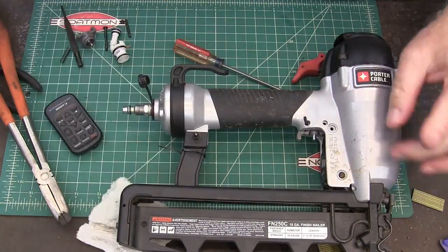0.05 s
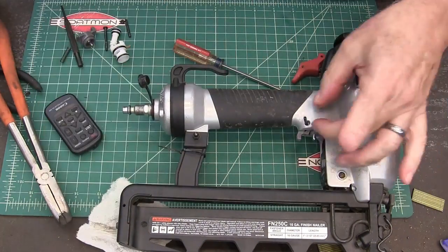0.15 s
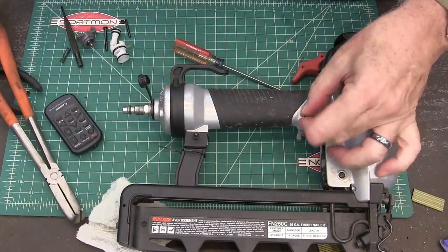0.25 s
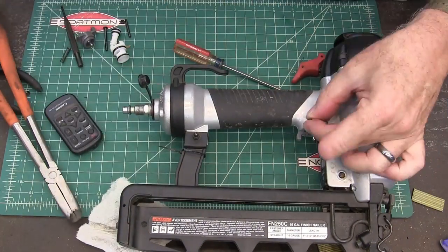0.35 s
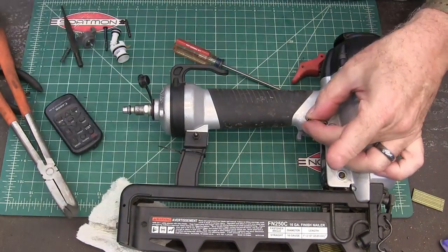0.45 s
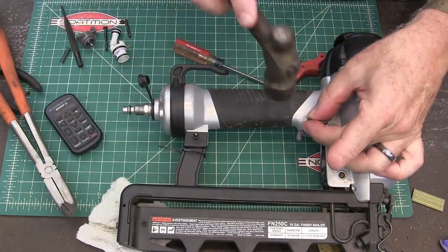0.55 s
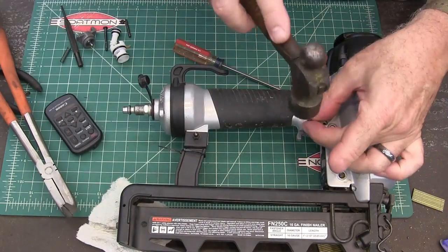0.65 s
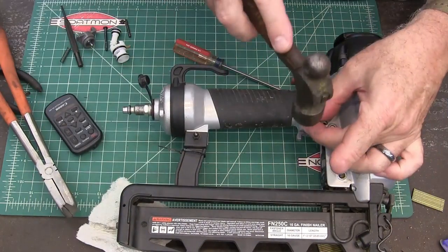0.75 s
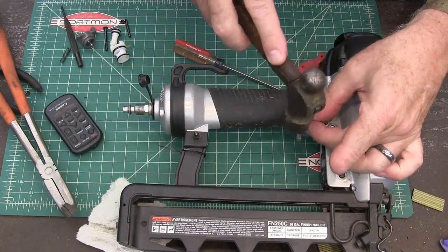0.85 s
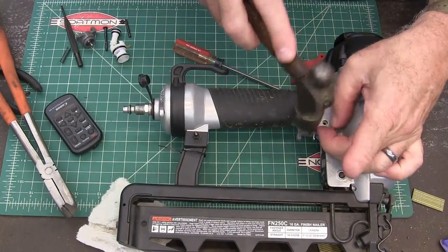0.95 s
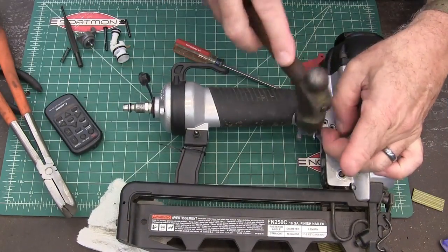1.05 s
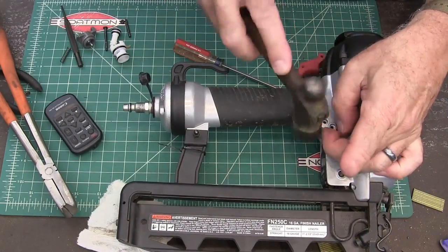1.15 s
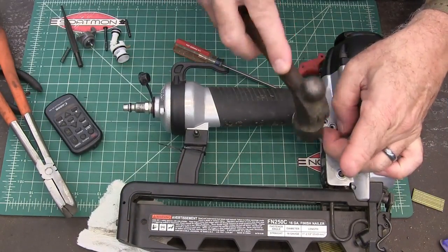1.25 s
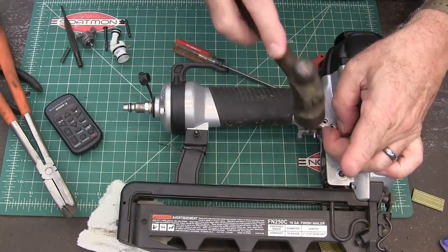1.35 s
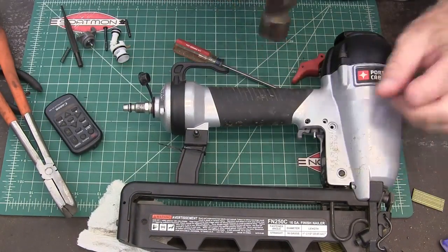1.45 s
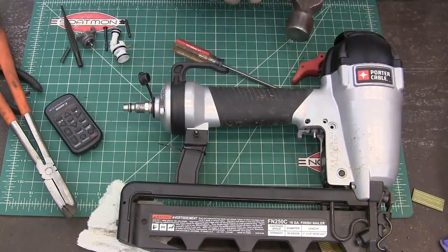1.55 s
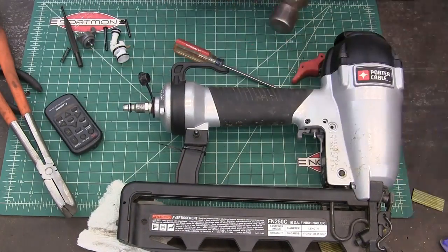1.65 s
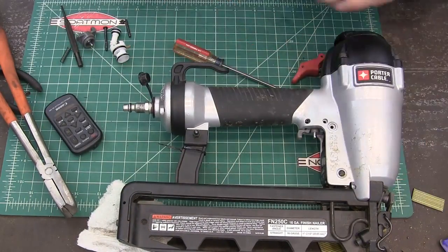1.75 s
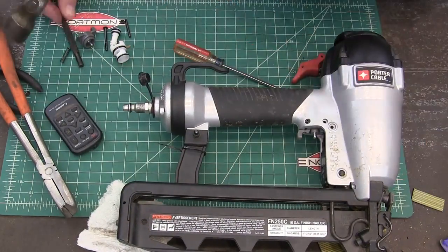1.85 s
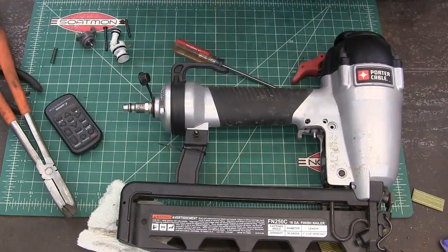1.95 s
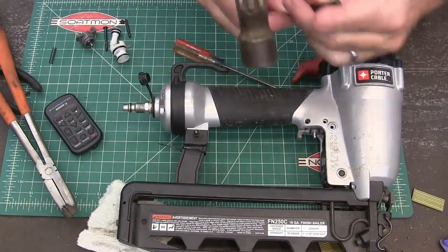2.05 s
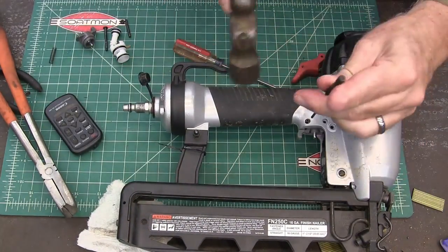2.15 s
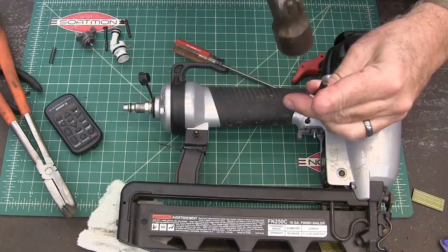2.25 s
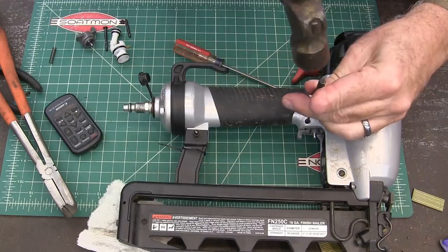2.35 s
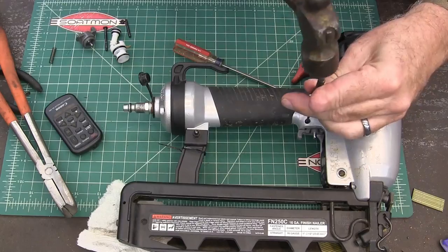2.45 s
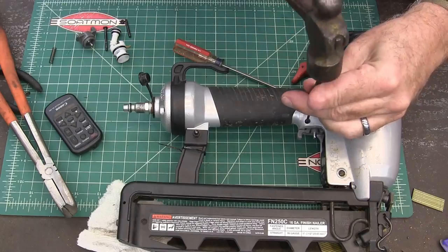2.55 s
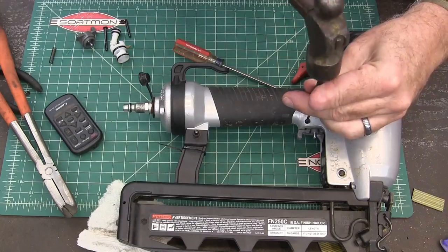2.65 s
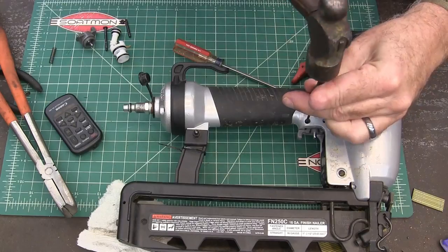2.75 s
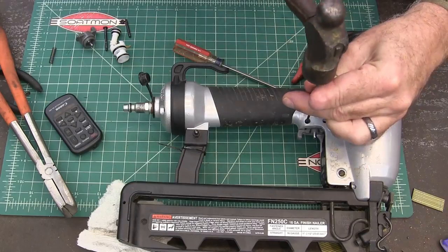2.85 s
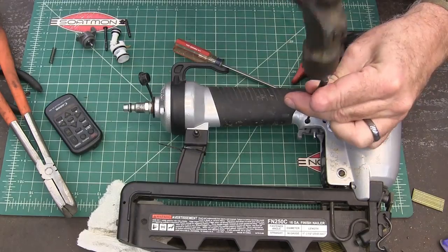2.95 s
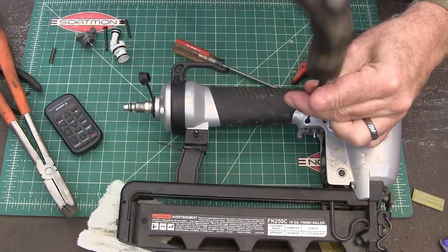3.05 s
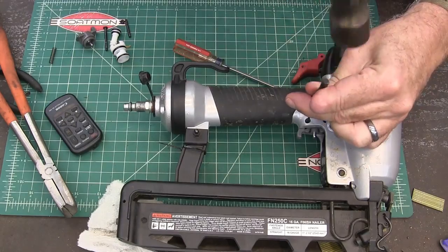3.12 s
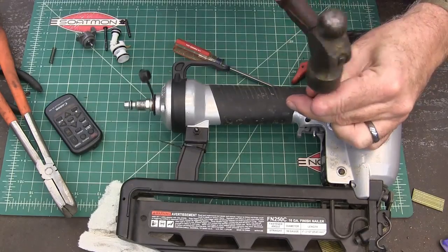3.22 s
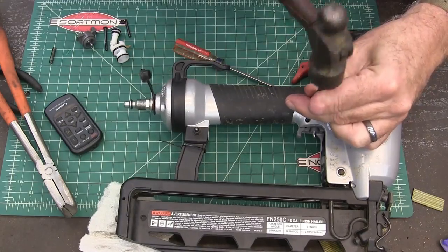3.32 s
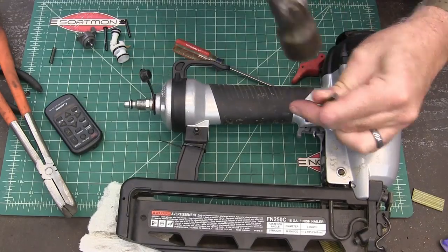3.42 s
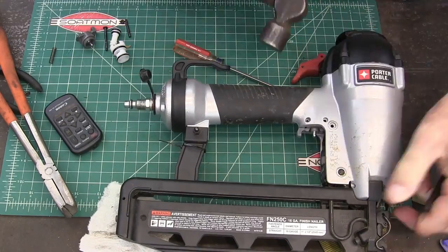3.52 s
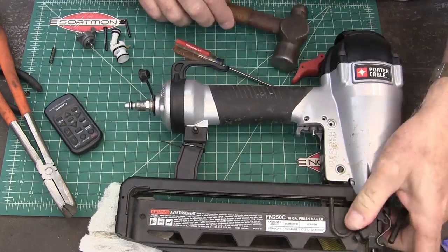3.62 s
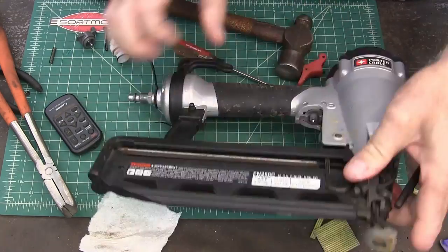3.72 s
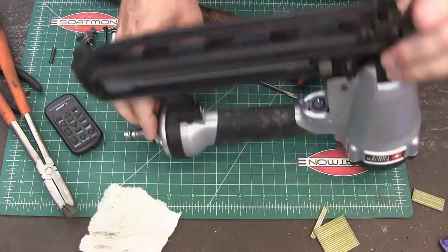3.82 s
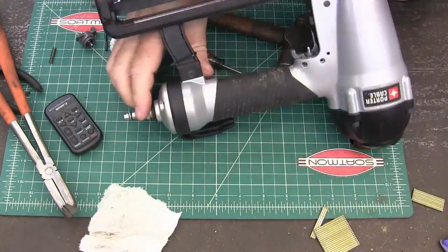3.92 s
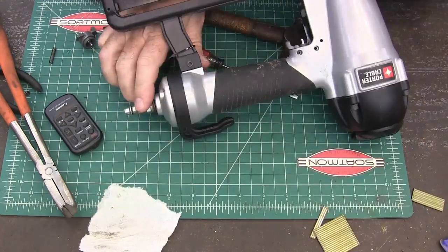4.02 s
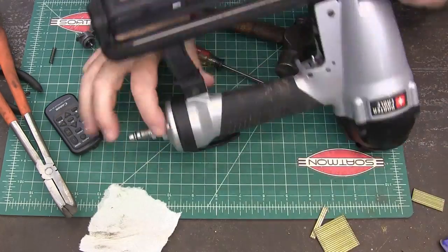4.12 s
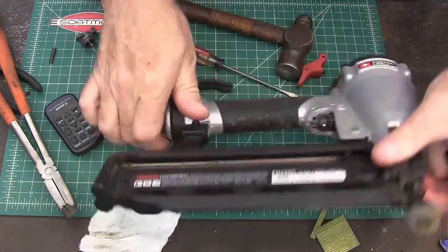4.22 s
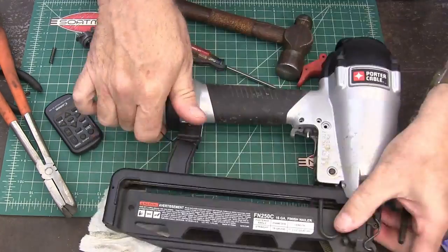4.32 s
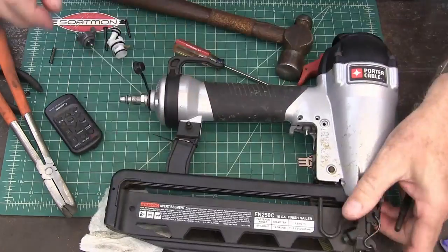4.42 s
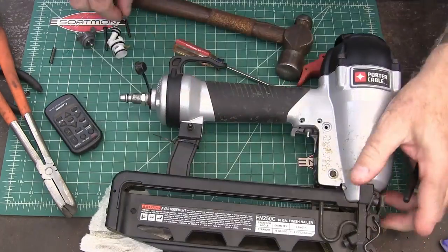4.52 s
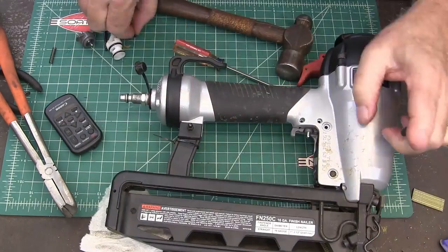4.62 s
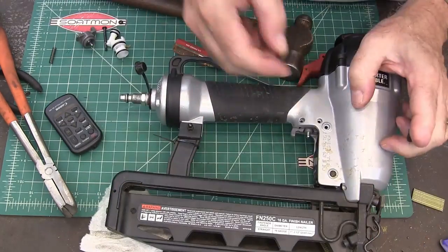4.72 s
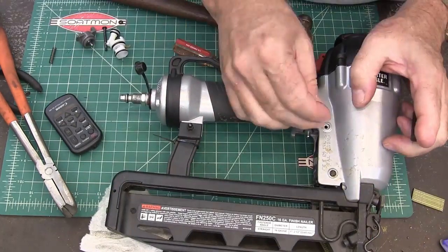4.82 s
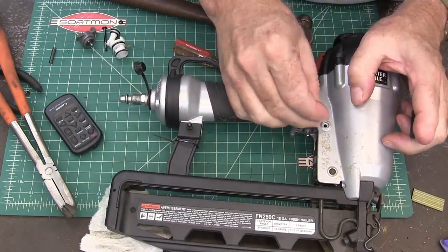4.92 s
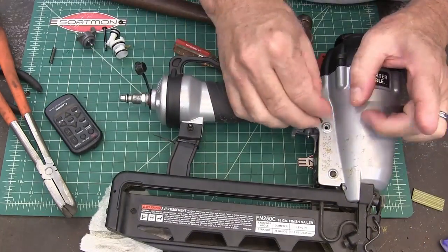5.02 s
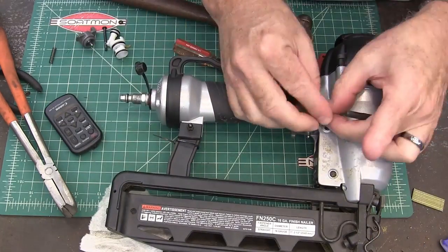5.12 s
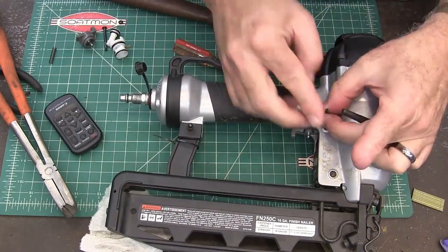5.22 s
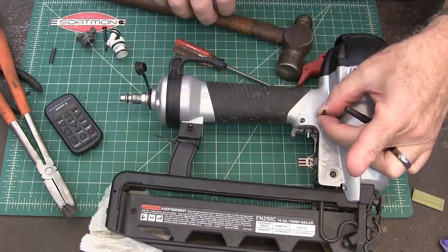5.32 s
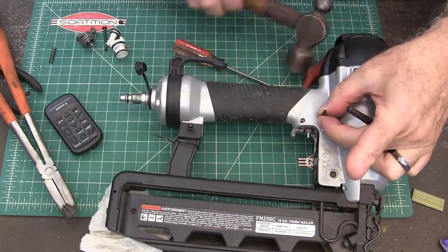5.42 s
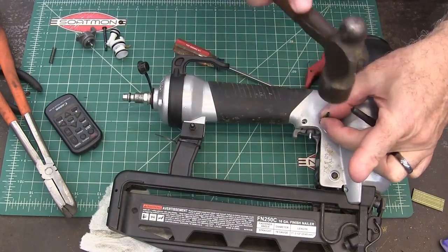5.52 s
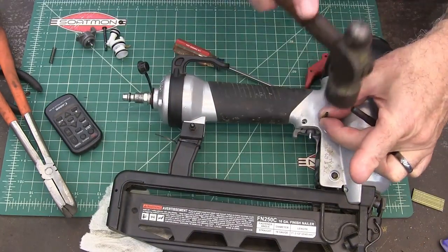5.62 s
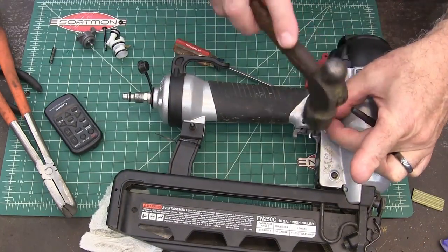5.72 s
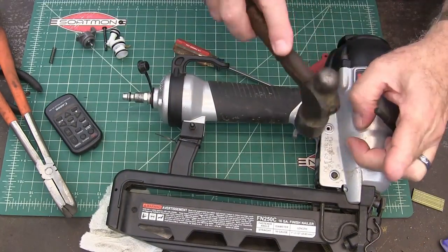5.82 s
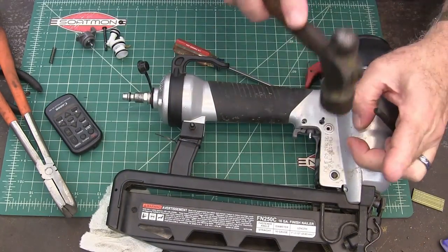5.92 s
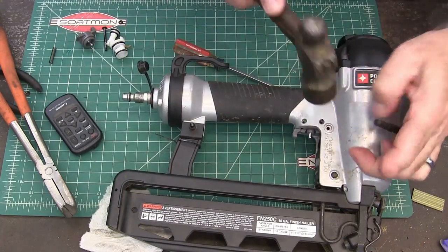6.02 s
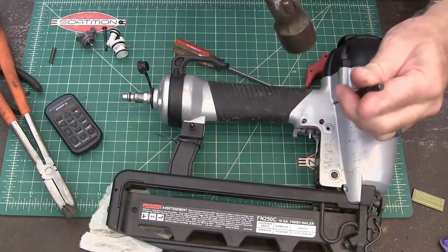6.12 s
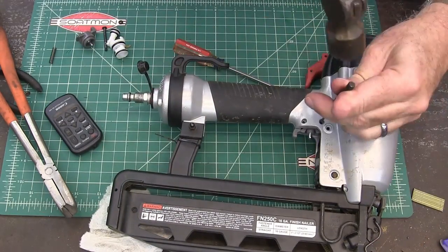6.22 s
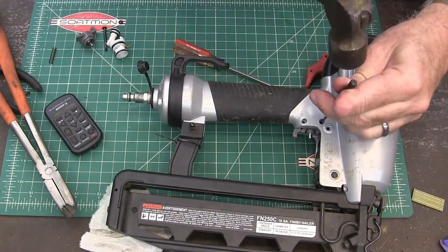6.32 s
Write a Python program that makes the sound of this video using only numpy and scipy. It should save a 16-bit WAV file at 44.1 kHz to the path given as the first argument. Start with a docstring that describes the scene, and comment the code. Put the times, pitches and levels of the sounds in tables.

```python
"""A small, quiet workshop: a small hammer taps a steel pin into the alloy housing of a nail gun on a rubber mat,
in three quick runs. Each blow is a noise burst that swells, cracks and dies, shaped by the gun's resonances.
Before and between the runs, tools and gun slide, click and are set down as softer bursts with thuds. Steel parts
jingle as dying sines, fingers rub as swells of noise, the room answers faintly and a steady hush lies behind."""
import sys
import numpy as np
from scipy import signal
from scipy.fft import rfft, irfft, next_fast_len
from scipy.io import wavfile
from scipy.ndimage import map_coordinates

SR = 44100
rng = np.random.default_rng(int(sys.argv[2]) if len(sys.argv) > 2 else 0)


def generate_wav(signal):
    """Clip the signal to [-1, 1] and save it as 16-bit WAV at the path in sys.argv[1]."""
    frames = np.transpose(np.atleast_2d(signal))
    scaled = np.clip(frames, -1, 1) * 32767
    pcm = np.round(scaled).astype(np.int16)
    wavfile.write(sys.argv[1], SR, pcm)


N = 281049

# Registers of a contact, thud to fizz. Each row: lower edge in Hz, upper edge in Hz.
REGISTERS_HZ = [(60, 260), (260, 700), (700, 2400), (2400, 6000), (6000, 15500)]


def amp(db):
    """Decibels to gain."""
    return 10 ** (np.asarray(db) / 20)


def unit(x):
    """Scaled to rms 1."""
    return x / np.sqrt(np.mean(x ** 2) + 1e-20)


def along(points, hz):
    """(Hz, value) points read on a log frequency axis."""
    f, v = np.transpose(points)
    return np.interp(np.log(hz + 1), np.log(f + 1), v)


def filtered(x, response):
    """x times a response of frequency."""
    n = x.shape[-1]
    m = next_fast_len(n + 2048)
    spectrum = rfft(x, m) * response(np.fft.rfftfreq(m, 1 / SR))
    return irfft(spectrum, m)[..., :n]


def noise(size, alike):
    """Stereo white noise; alike is the correlation of the two channels."""
    common, side = rng.standard_normal((2, size))
    turn = np.arccos(np.clip(alike, -1, 1)) / 2
    return np.cos(turn) * common + np.sin(turn) * np.array([side, -side])


def add(track, s, sound):
    """Mix a stereo sound into the track from time s."""
    start = max(round(s * SR), 0)
    part = sound[:, :N - start]
    track[:, start:start + part.shape[1]] += part


def ripple(hz, step_hz):
    """A smooth random curve over frequency, one knot every step_hz."""
    return map_coordinates(rng.standard_normal(1024), [hz / step_hz], mode="wrap")


def favoured(hz, centre_hz, width, boost_db):
    """Gain of the resonance that the point of contact drives hardest; width is relative to its centre."""
    return amp(boost_db / (1 + (2 * (hz / centre_hz - 1) / width) ** 2))


def octaves_above(hz):
    """How far the middle of each register, knock to fizz, lies above hz."""
    return np.log2(REGISTERS_HZ[1:]).mean(axis=1) - np.log2(hz)


def body(broad, hz, ringing):
    """Gain of the gun: its resonances, scaled in dB by ringing, stand on a broad response."""
    # Resonances of the gun on the bench. Each row: centre in Hz, width in Hz,
    # height over the broad response in dB before ringing scales it.
    resonances = [(163, 53, 10), (268.7, 14, 8.5), (303, 12, 5.5), (371.5, 54, 10), (479.7, 56, 8),
                  (518, 28, 5.5), (723, 24, 4), (818, 46, 4.5), (1200, 85, 3.5), (1322, 66, 5),
                  (1600, 110, 2), (1949, 170, 4), (2440, 150, 1), (3197, 55, 5), (3796, 70, 6),
                  (4480, 74, 6.5), (5600, 130, 4.5), (6900, 170, 5.5), (7400, 290, 4), (7826, 115, 8.5),
                  (9930, 35, 3.5)]
    peaks_db = sum(db / (1 + (2 * (hz - centre) / width) ** 2) for centre, width, db in resonances)
    return amp(along(broad, hz) + ringing * peaks_db)


def contacts(rows, broad, ringing, knock_db, ring_db, swell_shape, decay, grain_db):
    """Each burst swells to its peak, with or without a crack, holds, then every register dies at its own speed."""
    # Decay of each register, thud to fizz: t60 in s before decay scales it. Mat and hand damp the treble most.
    register_t60_s = [.135, 0.094, 0.095, 0.083, 0.05]
    # Crack of each register, thud to fizz. Each row: share of crack and of grain (0-1), time constant in s.
    crack_shares = [(0, .004), (0.299, 0.0023), (0.901, 0.0037), (1, 0.0021), (1, 0.0022)]
    size, lead_s = 12288, .06
    track = np.zeros((2, N))
    t = np.arange(size) / SR - lead_s
    hz = np.fft.rfftfreq(size, 1 / SR) + 1
    colour = body(broad, hz, ringing)
    bands = []
    for k, (low_hz, high_hz) in enumerate(REGISTERS_HZ):
        low_cut = 1 + (low_hz / hz) ** (16 if k else 6)  # gentler under the thud
        high_cut = 1 + (hz / high_hz) ** 16
        bands.append(colour / np.sqrt(low_cut * high_cut))
    for s, swell_s, hold_s, crack_db, levels_db, knock_hz, ring_hz in rows:
        # each contact picks out its own set of the many upper modes
        uneven_db = 2.3 * np.minimum(hz / 1500, 1) * (ripple(hz, 70) + .7 * ripple(hz, 260))
        modes = amp(uneven_db)
        modes = modes * favoured(hz, knock_hz, 0.096, knock_db) * favoured(hz, ring_hz, 0.3, ring_db)
        # same noise in both channels, phase between them varying over frequency
        spread = np.exp(1j * np.outer([1, -1], 1.15 * ripple(hz, 200)))
        noise_spectrum = modes * spread * np.exp(2j * np.pi * rng.random(len(hz)))
        # random levels, 400 a second, make the burst grainy
        grain = amp(grain_db * map_coordinates(rng.standard_normal(128), [(t + lead_s) * 400]))
        rise_db = -30 * (np.maximum(-t, 0) / max(swell_s, .004)) ** swell_shape
        for band, db, t60_s, (share, crack_s) in zip(bands, levels_db, register_t60_s, crack_shares):
            crack = share * amp(crack_db - 3.0) * np.exp(-np.abs(t) / crack_s)
            fall_db = -60 * np.maximum(t - hold_s, 0) / (t60_s * decay)
            shape = np.hypot(amp(rise_db + fall_db) * grain ** share, crack)
            burst = shape * irfft(noise_spectrum * band)
            # each channel carries the energy of the envelope
            burst *= np.linalg.norm(shape) / np.linalg.norm(burst, axis=1, keepdims=True)
            add(track, s - lead_s, amp(db) * burst)
    return track


def rings(strikes, modes, attack_s):
    """Freely dying modes, at new strengths for each strike and at their own phase in each channel."""
    track, t = np.zeros((2, N)), np.arange(SR // 2) / SR
    for s, db in strikes:
        for hz, mode_db, t60_s in modes:
            phase = rng.uniform(0, 2 * np.pi) + rng.normal(0, 1.0, (2, 1))
            level_db = db + mode_db + rng.normal(0, 1.7)
            fade = amp(level_db - 60 * t / t60_s) * (1 - np.exp(-t / attack_s))
            add(track, s, fade * np.sin(2 * np.pi * hz * t + phase))
    return track


def room_tone():
    """The steady hush of the workshop: coloured noise at -64 dB rms."""
    # Spectrum of the hush. Each row: frequency in Hz, relative density in dB.
    air = [(12, -14.5), (20, -2.5), (64, -22), (252, -13.5), (306, -12.5), (333, -17), (393, -11.5),
           (465, -14), (932, -18), (1070, -18), (2610, -22), (3850, -23.5), (15500, -39)]
    return amp(-64) * unit(filtered(noise(N, .15), lambda hz: amp(along(air, hz))))


def walls(x):
    """The small room's answer: convolution with noise that dies at a different speed in each band."""
    # Each row: frequency in Hz, t60 in s.
    wall_t60 = [(150, 0.12), (1000, 0.24), (4000, 0.14), (12000, 0.22)]
    hz, t, z = signal.stft(rng.standard_normal((2, SR // 2)), SR, nperseg=256)
    dying = z * amp(-60 * t / along(wall_t60, hz)[:, None])
    tail = signal.istft(dying, SR, nperseg=256)[1]
    return signal.fftconvolve(x, tail / np.linalg.norm(tail[0]), axes=1)[:, :N]


def hands():
    """Small steel parts jingle as dying modes; fingers rub as noise, each stroke swelling and fading."""
    # Fingers rubbing over the tool. Each row: centre in s, half-length to 1/e in s, peak level in dB.
    rubs = [(0, 0.047, -60), (3.584, 0.14, -67), (3.95, 0.33, -66), (4.448, 0.18, -71.5),
            (4.734, 0.12, -63.5), (5.361, 0.19, -66.5), (6.33, .25, -71)]
    # Spectrum of rubbing skin. Each row: frequency in Hz, relative density in dB.
    skin = [(100, -9), (400, 4), (2500, -3.5), (7000, -10), (12000, -22), (15500, -22.5)]
    # Small steel parts being picked up. Each row: start in s, level in dB.
    jingles = [(.282, -53), (.3, -54), (.32, -54), (.485, -53), (.505, -52)]
    # Modes of those parts. Each row: frequency in Hz, mean level over the jingle in dB, t60 in s.
    steel = [(8300, 3, 0.11), (8900, 9, 0.11), (9700, 13, 0.1), (10100, 17.5, 0.057), (10500, -1, 0.13),
             (10900, 13.5, 0.12), (11700, 7, .11), (13170, 18, 0.062), (14080, 0, .1)]
    t = np.arange(N) / SR
    strokes = sum(amp(db) * np.exp(-((t - s) / length_s) ** 2) for s, length_s, db in rubs)
    rub = strokes * unit(filtered(noise(N, 0.067), lambda hz: amp(along(skin, hz))))
    return rings(jingles, steel, attack_s=.014) + rub


def handling():
    """Tools slide and click, each around its own ring; whatever weight lands on the bench thuds and knocks."""
    # Slides, clicks and set-downs of gun and tools. Each row: time of the peak in s, hold after the peak in s,
    # crack setting in dB (3 dB over its peak relative to the burst), level in dB, ring in Hz, thud in dB.
    moves = [(.227, .011, 13, -47, 520, -54), (.275, 0.0067, 14.5, -37.5, 800, -51),
             (.291, .04, -7, -48, 5500, -76), (.338, .014, 4.5, -45, 1150, -65),
             (0.366, 0.0046, 16.5, -47, 4740, -57), (0.452, 0.014, 8, -36, 2700, -60),
             (.48, .04, -20, -45.5, 5500, -66), (.52, .028, 10, -51, 2000, -65),
             (1.584, .021, 4, -54, 4550, -62.5), (2.186, .013, -25, -57, 7450, -81),
             (3.477, 0.0062, 18, -51, 6300, -66), (3.666, .004, -8, -32, 1970, -37),
             (3.692, 0.0008, 8, -37.5, 2420, -34.5), (3.725, 0.0029, 6, -25, 965, -48),
             (3.809, 0.032, -20, -45.5, 1920, -62), (3.844, 0.0031, -12, -42, 3120, -51.5),
             (3.873, .022, 12, -53.5, 5640, -68), (4.034, 0.0016, -10, -47, 3380, -61),
             (4.065, .001, 7, -48, 5700, -69), (4.175, .004, 1, -56.5, 4600, -57),
             (4.234, 0.026, 18, -54, 4800, -70), (4.299, 0.021, -20, -54, 2800, -53.5),
             (4.381, 0.011, 8, -52.5, 3300, -52.5), (4.502, 0.017, 9, -38.5, 2100, -46),
             (4.621, 0.012, 9, -52.5, 2046, -82), (5.079, .004, 12, -46, 2300, -45),
             (5.448, .001, 4.5, -54, 2310, -68), (5.5, .011, 3, -30, 3100, -55)]
    # Broad response of a handled contact. Each row: frequency in Hz, relative density in dB.
    handled = [(30, -29), (80, 3), (300, -4), (1000, 4), (2400, -4), (4000, -7), (7800, -8.5), (9500, -7.5),
               (13000, -17), (15500, -37)]
    fade_below_db, fade_above_db = 6.5, 9  # per octave away from the ring
    touches = []
    for s, hold_s, crack_db, db, ring_hz, thud_db in moves:
        away = octaves_above(ring_hz)
        upper_db = db - np.maximum(-fade_below_db * away, fade_above_db * away) + 3
        upper_db[0] = max(upper_db[0], thud_db - 2)  # a thud brings a knock
        swell_s = .022 - .00035 * crack_db  # less crack, gentler start
        touches.append((s, swell_s, hold_s, crack_db, [thud_db, *upper_db], 372, ring_hz))
    return contacts(touches, handled, ringing=0.696, knock_db=7.5, ring_db=4.5, swell_shape=1.26,
                    decay=1.0, grain_db=1.5)


def hammer():
    """Blows on the pin shake the whole gun: a hard one is bright, a low one thuds and rocks it more."""
    # Hammer blows. Each row: time of the peak in s, hold after the peak in s, crack setting in dB
    # (3 dB over its peak relative to the burst), level in dB, hardness in dB, knock in Hz, ring in Hz.
    taps = [(.832, 0.011, -2, -39.5, -2, 390, 2160), (0.9, 0.00084, 3.5, -32, 1, 370, 1380),
            (1.018, 0.0031, 9, -32, 3, 305, 7400), (1.113, .005, 5, -26, 6, 383, 7900),
            (1.2, .011, -8.5, -29.5, 6, 404, 1400), (1.28, 0.018, -17, -31.5, 1, 282, 1980),
            (1.365, .023, -3.5, -27, -8.5, 443, 783), (2.579, 0.0012, 16, -34, -5, 470, 1220),
            (2.731, 0.0099, 6.5, -41.5, -14, 366, 705), (2.837, 0.00087, 18.5, -41, -12, 398, 940),
            (3.022, .012, 11, -25, 1, 512, 1620), (3.114, .024, -22, -29.5, -1.5, 358, 1280),
            (3.198, .025, -21, -30, -3, 282, 1320), (3.272, .026, 3, -30.5, -1, 255, 1820),
            (3.347, .025, -19, -29.5, -0.5, 388, 790), (5.617, 0.00091, 12.5, -44.5, -6, 300, 1130),
            (5.697, .008, -18, -28, 0, 262, 1960), (5.762, .012, -12, -30.5, 1, 366, 1300),
            (5.858, .01, 3.5, -28.5, 2, 314, 1680), (5.941, 0.0087, 7.5, -30.5, 5.5, 375, 1930),
            (6.016, 0.0082, 14.5, -30.5, 3.5, 364, 1310)]
    # Registers of a blow, knock to fizz; a hard contact trades knock for fizz.
    # Each row: offset from the blow's level in dB, share of its hardness.
    blow_registers = [(2.3, -.6), (0, 0), (-1.8, .08), (-5.5, 1)]
    # Broad response of a struck contact. Each row: frequency in Hz, relative density in dB.
    struck_response = [(30, -14), (60, -3.5), (90, -1.5), (400, 0), (650, 1), (1400, 6.5), (2300, -1.5),
                       (3200, -8.5), (7800, -9), (9300, -13), (12200, -12.5), (14000, -25), (15500, -37.5)]
    # The gun rocks on the mat after every blow. Each row: frequency in Hz, mean level in dB, t60 in s.
    rocking = [(162, -3.5, 0.36), (378.8, -3, 0.15)]
    # The last blow of the first run seats the pin: time in s, level in dB.
    seated = (1.365, -34)
    # The whole frame then rings on. Each row: frequency in Hz, mean level in dB, t60 in s.
    frame = [(169, 5, 0.25), (430, -8, 0.18), (648, -2, 0.38), (1300, -12.5, 0.33), (1437, -24, .2)]
    blows, shoves = [], []
    for s, hold_s, crack_db, db, hardness_db, knock_hz, ring_hz in taps:
        # the lower the knock, the more of the gun's weight thuds: 7 dB per octave
        thud_db = db - 5 - 7 * np.log2(knock_hz / 365.3)
        upper_db = [db + over_db + share * hardness_db for over_db, share in blow_registers]
        swell_s = .0175 - .12 * hold_s  # longer hold, quicker swell
        blows.append((s, swell_s, hold_s, crack_db, [thud_db, *upper_db], knock_hz, ring_hz))
        shoves.append((s, thud_db - 7))
    struck = contacts(blows, struck_response, ringing=1.15, knock_db=7, ring_db=4.0, swell_shape=1.33,
                      decay=0.96, grain_db=1.46)
    rocked = rings(shoves, rocking, attack_s=0.0059)
    return struck + rocked + rings([seated], frame, attack_s=0.00825)


def scene():
    """The work on the bench, its room and the hush behind it."""
    bench = hands() + handling() + hammer()
    return bench + amp(-25.5) * walls(bench) + room_tone()


def record(dry):
    """Band limit: nothing passes from 15.7 kHz up."""
    return filtered(dry, lambda hz: hz < 15700)


dry = scene()
out = record(dry)
generate_wav(out)
```